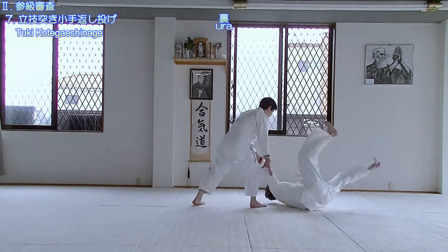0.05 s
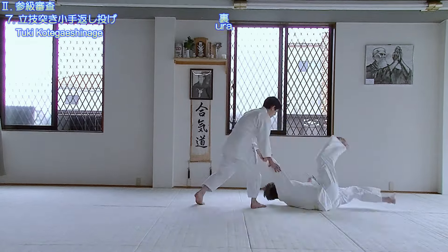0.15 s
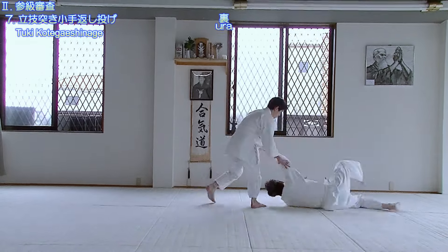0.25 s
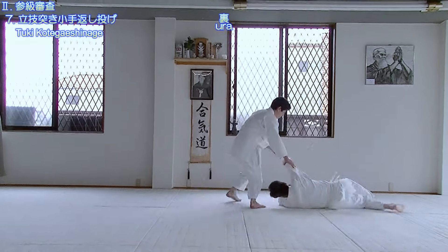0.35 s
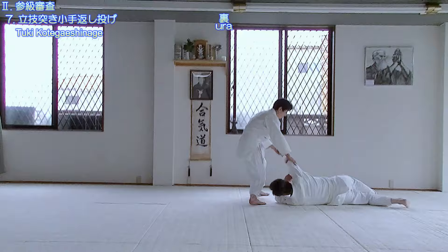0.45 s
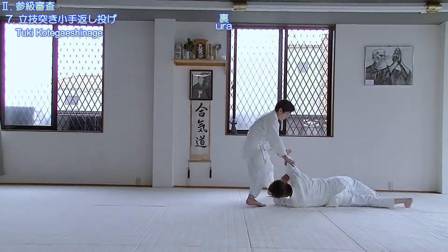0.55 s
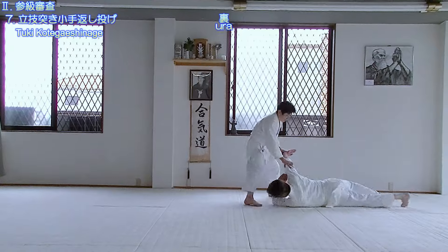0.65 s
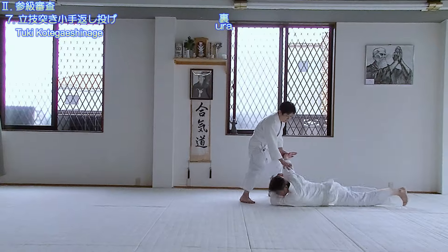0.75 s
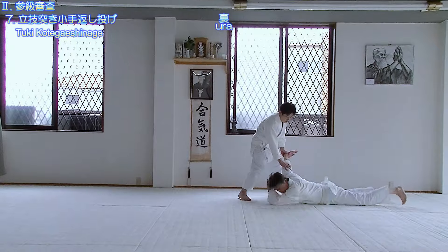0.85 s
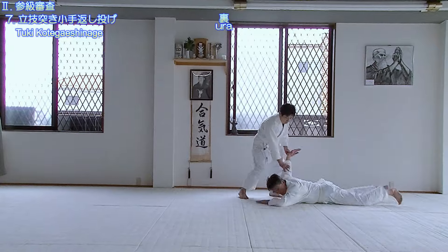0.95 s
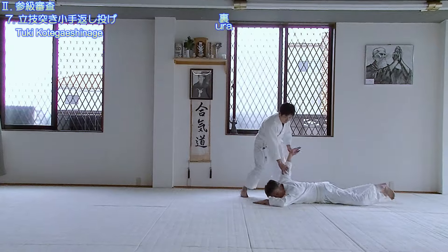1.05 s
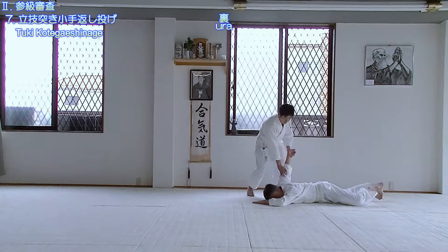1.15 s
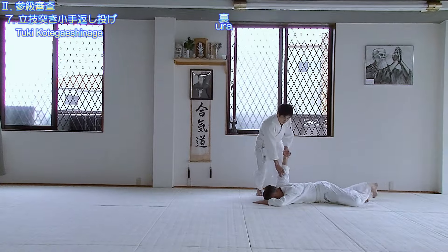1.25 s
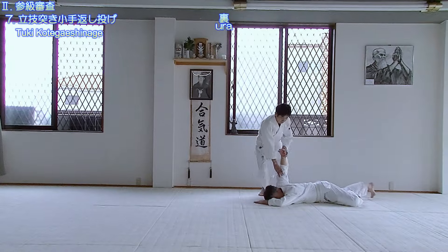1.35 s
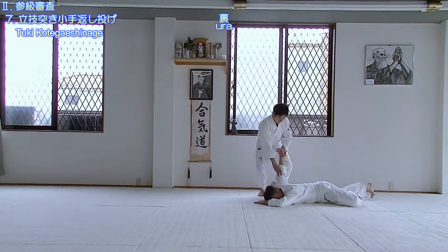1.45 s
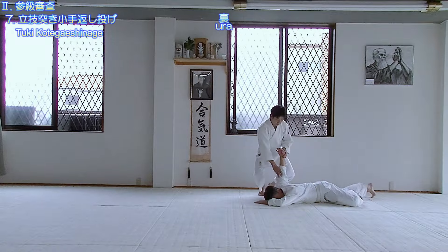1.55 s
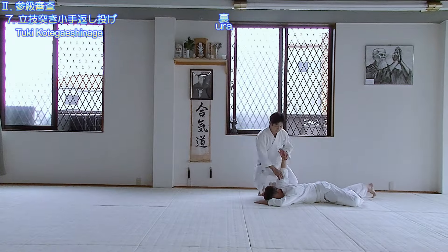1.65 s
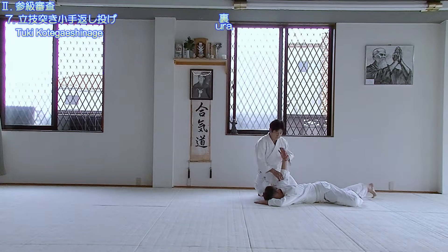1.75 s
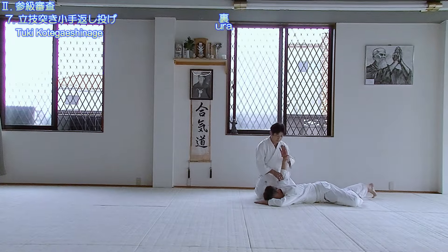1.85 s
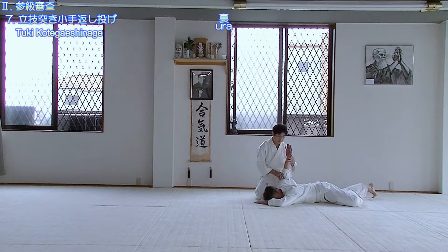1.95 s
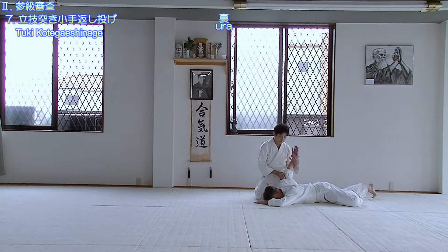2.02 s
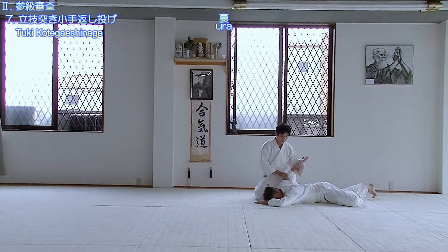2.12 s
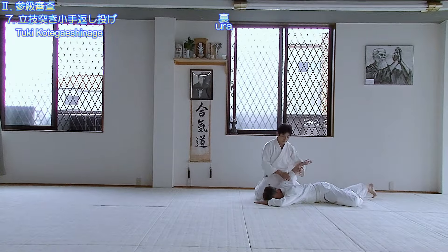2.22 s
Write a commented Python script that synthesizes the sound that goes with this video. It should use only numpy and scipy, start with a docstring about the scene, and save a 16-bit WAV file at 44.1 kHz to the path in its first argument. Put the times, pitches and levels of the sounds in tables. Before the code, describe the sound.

Loud tumbling thumps and bright slaps on a sprung mat floor, followed by dragging cotton, brief squeaks and a second slapping thump, then quiet outdoor hum; bare reverberant hall, heard by a stereo camera at some distance.

```python
"""Throw and pin on padded mats

A person is thrown onto padded mats in a bare hall, rolls over and is pinned.
Limbs thump as sinking damped tones with puffs of air, slap as bright noise bursts and ring the sprung floor.
The roll is made of soft bumps, cotton and feet of dense clicks, and squeaks of gliding narrow noise.
Street noise, a low hum and a thin high chirr, all shaped noise and tone, come through open windows.
"""
import sys
import numpy as np
from scipy import signal
from scipy.fft import rfft, irfft
from scipy.io import wavfile
from scipy.ndimage import uniform_filter1d

SR = 44100
rng = np.random.default_rng(int(sys.argv[2]) if len(sys.argv) > 2 else 0)


def persist_wave(psi):
    """Save psi, clipped to +-1, as 16-bit WAV."""
    counts = np.round(np.clip(psi, -1, 1) * 32767).astype(np.int16)
    wavfile.write(sys.argv[1], SR, np.atleast_2d(counts).T)


def gain_from_db(level_db):
    """Convert decibel levels to linear amplitude factors (20 dB per decade)."""
    decades = np.asarray(level_db, float) / 20
    return 10 ** decades


N = 101430  # samples, 2.3 s
T = np.arange(N) / SR

# Spectrum of the street wash. Each row: frequency in Hz, relative level in dB per Hz.
STREET_COLOUR = [(33, -30), (40, -10), (56, -5.5), (150, -8), (340, -3), (765, -8), (1100, -7), (1900, -12),
                 (2700, -19), (4000, -26), (8000, -35.5), (13300, -40), (15100, -52), (15350, -80)]
# Slow swell of the street. Each row: time in seconds, gain in dB.
STREET_SWELL = [(0, 1.5), (1.86, 0), (1.93, 1.5), (2.05, -0.5), (2.3, -1)]
# Low hum. Each row: pitch in Hz, level in dB rms, width in Hz of its wavering part.
HUM = [(65.4, -54.5, 2.3)]
# Bands of the high chirr. Each row: centre in Hz, width in Hz of each of two passes,
# level in dB rms ahead of the throb.
CHIRR = [(14540, 590, -62.5), (14351, 40, -71), (14400, 720, -67.5)]
# Cloth and sliding feet. Each row: time in seconds, level in dB, centre of the swish in Hz,
# swish share of the power 0-1.
CLOTH_STROKES = [(0, -47.5, 3720, 0.4), (.07, -59.5, 2100, 0), (.205, -51, 2420, 0.56),
                 (.225, -34, 2410, 1), (.335, -36, 2220, 0.91), (.38, -30.5, 1950, 0.82),
                 (.53, -33.5, 2240, 0.03), (.668, -43.5, 2040, 0.4), (.7, -36, 3260, 0),
                 (.745, -36.5, 3120, 0.02), (.785, -35, 3410, 0.06), (.86, -40, 2870, 0.19),
                 (.96, -41.5, 2900, 0.02), (1.01, -34, 3150, 0.7), (1.08, -38.5, 2660, 0.36),
                 (1.25, -45, 2520, 0.04), (1.4, -52, 2190, 0.35), (1.6, -62, 2100, 0.5)]
# Spectrum of the wide rustle. Each row: frequency in Hz, relative level in dB per Hz.
CLOTH_COLOUR = [(530, -34), (900, -11), (1230, -13), (2020, -3.5), (2390, -8.5), (3380, -3.5), (6200, -7.5),
                (14100, -17.5), (15300, -58)]
# Skin and cloth squeaking on the mat. Each row: start in seconds, length in seconds, level in dB,
# start pitch in Hz, end pitch in Hz.
SQUEAKS = [(0.434, 0.073, -27, 658, 705), (0.429, 0.25, -37.5, 2090, 2022),
           (0.69, 0.043, -38.5, 3190, 3530), (0.758, .032, -40, 3310, 3200),
           (0.771, 0.022, -40, 4520, 4600), (0.816, 0.019, -38, 3030, 2730),
           (0.97, 0.052, -28.5, 1062, 1060)]
# The body's weight dragging over the mat. Each row: time in seconds, level in dB.
DRAG_LEVEL = [(0, -39.5), (.06, -42), (.205, -40.5), (.225, -19), (.33, -22), (.4, -21), (.54, -26),
              (.64, -40.5), (.75, -41.5), (.83, -35), (.96, -33), (1.0, -22.5), (1.12, -30), (1.16, -47),
              (1.3, -42), (1.45, -61)]
# Spectrum of the dragging bumps. Each row: frequency in Hz, relative level in dB per Hz.
DRAG_COLOUR = [(29, -23), (50, -17.5), (145, -9), (185, -2), (245, -1.5), (448, -5.5), (643, -5),
               (1050, -13.5), (2020, -21), (2500, -29), (3250, -29), (5500, -120)]
# Hands and feet slapping the vinyl. Each row: start in seconds, level in dB, brightest frequency in Hz,
# share of that band in the power 0-1, t60 in seconds.
SLAPS = [(0.212, -15.5, 4630, 0.01, 0.039), (0.221, -25, 2570, 0.18, 0.32), (0.349, -13, 2010, 0.18, 0.071),
         (0.362, -19, 1850, 0.44, 0.086), (0.417, -21, 2130, 0, 0.062), (0.9818, -18.5, 3600, 0.8, 0.031),
         (0.9877, -16, 3200, 0.57, 0.042), (0.998, -26.5, 4700, 0.17, 0.12), (1.459, -46, 4000, 0.01, 0.24)]
# Spectrum of a slap's air burst. Each row: frequency in Hz, relative level in dB per Hz.
SLAP_COLOUR = [(410, -35.5), (700, 15), (1560, 3.5), (2080, 8.5), (2490, -0.5), (4190, 0.5), (5430, -4.5),
               (13800, -20), (15300, -58)]
# Modes of the boards under the mat. Each row: frequency in Hz, relative level in dB, t60 in seconds.
FLOOR_MODES = [(64.3, 0, 0.61), (94.7, 7.5, 0.16), (109.6, 11.5, 0.196), (131, 0.5, 0.43)]
# Body weight reaching the boards. Each row: start in seconds, level in dB,
# weight of the lowest mode 0-1 (the other modes get the rest).
BOOMS = [(0.039, -35.5, 0.78), (0.214, -24.5, 0.08), (0.248, -25, 1), (0.375, -20, 0.48), (0.4, -25, 0.88),
         (0.491, -28.5, 0.6), (0.98, -32.5, 0.66), (1.05, -40.5, 0.6)]
# Limbs landing. Each row: start in seconds, thump level in dB, mat pitch in Hz at the start,
# t60 in seconds before the cap LONGEST_T60.
THUMPS = [(0.039, -27.5, 285, 0.11), (.213, -14, 457, 0.086), (0.219, -18.5, 257, 0.088),
          (.236, -13.5, 185.4, 0.11), (0.274, -13, 430, 0.069), (.289, -17, 182.4, 0.15),
          (0.3484, -4, 274, 0.083), (0.37, -11, 222, 0.1), (0.414, -16, 248, 0.11),
          (0.445, -12.5, 202.5, 0.2), (0.411, -18.5, 667, 0.11), (.511, -8.5, 249, 0.054),
          (0.536, -23.5, 213, 0.07), (0.635, -30, 279, 0.12), (0.823, -23, 353, 0.053),
          (0.84, -20.5, 293, 0.065), (0.974, -19, 298, 0.046), (.983, -12, 292, 0.07),
          (0.994, -13, 379, 0.071), (1.01, -11, 237, 0.06), (1.061, -20.5, 298, 0.14),
          (1.098, -20.5, 197, 0.19), (1.161, -28, 197, 0.1)]
# Decay of the hall. Each row: frequency in Hz, t60 in seconds.
HALL_DECAY = [(250, 0.43), (1000, 0.98), (4000, 0.74), (12000, 0.31)]
# Likeness of the two ports. Each row: frequency in Hz, approximate left-right likeness 0-1.
SAME = [(300, .999), (1200, 0.95), (2500, 0.89), (5000, 0.84), (9000, 0.95), (14000, 0.99)]
# Balance of the two ports. Each row: frequency in Hz, left minus right in dB.
BALANCE = [(40, -2.5), (300, -2), (1400, -1), (2800, 0.1), (14000, 0.2)]

STREET_DB = -43  # rms ahead of the swell
CHIRR_THROB_DB, CHIRR_THROB_S = 3, 0.0032  # rms depth, smoothing time
FIBRES_PER_S, FIBRE_SPREAD_DB, SWISH_WIDTH_HZ = 3900, -0.5, 1820  # width of each of two passes
SQUEAK_WIDTH = 0.016  # share of the start pitch for each kHz: high squeaks are rougher
BUMPS_PER_S, BUMP_SPREAD_DB = 1200, 2.5
SLAP_RISE_S, SLAP_WIDTH = 0.0008, 0.5  # width as a share of the brightest frequency
BOOM_RISE_S = 0.007
THUMP_RISE_S, LONGEST_T60 = 0.001, 0.14  # seconds
SAG_PER_S = 2.2  # share of the pitch lost per second as the limb settles
PUFF_T60, PUFF_DB = 0.079, -11  # seconds, level relative to its thump
HALL_DB, SCATTER_S = -9.5, 0.04
LOW_CUT_HZ, EDGE_HZ = 24, 15760
KNEE_DB, SQUEEZE = -21, 0.31  # dB of gain taken per dB above the knee
ATTACK_S, RECOVER_DB_PER_S = 0.0035, 22.5  # smoothing time, fall of the held level


def evened(x):
    """Scales to rms 1."""
    return x / np.sqrt(np.mean(x ** 2) + 1e-20)


def read(points, hz):
    """Reads a table on a log-frequency axis."""
    f, value = np.transpose(points)
    return np.interp(np.log(hz + 1), np.log(f + 1), value)


def curve(table, column=1):
    """Reads one column of a time table at every sample."""
    rows = np.array(table, float)
    return np.interp(T, rows[:, 0], rows[:, column])


def colour(x, points):
    """Filters by a spectrum table with minimum phase, so that attacks stay sharp."""
    hz = abs(np.fft.fftfreq(8192, 1 / SR))
    log_gain = np.log(gain_from_db(np.maximum(read(points, hz), -100)))
    response = np.exp(np.conj(signal.hilbert(log_gain)))
    taps = np.fft.ifft(response).real[:4096]
    return signal.oaconvolve(x, taps)[:len(x)]


def resonate(x, hz, width):
    """A resonance of gain 1 that follows hz: shifts it to zero, smooths and shifts back."""
    turn = np.exp(2j * np.pi * np.cumsum(hz * np.ones(len(x))) / SR)
    r = np.exp(-np.pi * width / SR)
    return 2 * (turn * signal.lfilter([1 - r], [1, -r], x / turn)).real


def resonate_twice(x, hz, width):
    """Two equal resonances in a row, for steeper skirts."""
    return resonate(resonate(x, hz, width), hz, width)


def grains(per_s, spread_db):
    """Random clicks of either sign, their sizes spread exponentially in dB."""
    size = gain_from_db(spread_db * np.minimum(rng.exponential(1, N), 4))
    sign = rng.choice([-1., 1.], N)
    return size * sign * (rng.random(N) < per_s / SR)


def add(mix, s, sound):
    """Mixes a sound in at a time."""
    part = mix[round(s * SR):][:len(sound)]
    part += sound[:len(part)]


def street():
    """Street wash: noise built in short spectra whose level drifts in patches of time and pitch."""
    frames, hz = N // 256 + 5, np.fft.rfftfreq(1024, 1 / SR)
    real, imaginary, patches = rng.standard_normal((frames, 513, 3)).T
    patches = uniform_filter1d(patches, 14, 0)
    patches_db = evened(uniform_filter1d(patches, 10, 1))  # 1 dB rms
    spectra = (real + 1j * imaginary) * gain_from_db(read(STREET_COLOUR, hz)[:, None] + patches_db)
    wash = signal.istft(spectra, nperseg=1024, noverlap=768)[1][:N]
    return gain_from_db(STREET_DB + curve(STREET_SWELL)) * evened(wash)


def hum():
    """A low hum: a steady sine wavers against narrow noise on the same pitch."""
    out = np.zeros(N)
    for hz, db, width in HUM:
        waver = evened(resonate(rng.standard_normal(N), hz, width))
        out += gain_from_db(db) * evened(np.sin(2 * np.pi * hz * T) + 0.93 * waver)
    return out


def chirr():
    """A thin high chirr: narrow noise bands throbbing together, quickly and at random."""
    out = np.zeros(N)
    for hz, width, db in CHIRR:
        out += gain_from_db(db) * evened(resonate_twice(rng.standard_normal(N), hz, width))
    throb = evened(uniform_filter1d(rng.standard_normal(N), round(CHIRR_THROB_S * SR)))
    return out * gain_from_db(CHIRR_THROB_DB * throb)


def cloth():
    """Dense fibre clicks: a wide rustle and a narrower swish that moves with the stroke."""
    fibres = grains(FIBRES_PER_S, FIBRE_SPREAD_DB)
    hz, share = curve(CLOTH_STROKES, column=2), curve(CLOTH_STROKES, column=3)
    swish = evened(resonate_twice(fibres, hz, SWISH_WIDTH_HZ))
    rustle = evened(colour(fibres, CLOTH_COLOUR))
    mix = np.sqrt(1 - share) * rustle + np.sqrt(share) * swish
    return mix * gain_from_db(curve(CLOTH_STROKES)) * (T < CLOTH_STROKES[-1][0])


def squeaks():
    """Short fuzzy whistles: narrow noise that glides in pitch under one arch."""
    out, air = np.zeros(N), rng.standard_normal(N)
    for s, length, db, from_hz, to_hz in SQUEAKS:
        u = np.arange(0, length, 1 / SR) / length  # 0-1 through the squeak
        hz = from_hz + (to_hz - from_hz) * u
        width = SQUEAK_WIDTH * from_hz ** 2 / 1000
        tone = evened(resonate_twice(air[round(s * SR):][:len(u)], hz, width))
        add(out, s, gain_from_db(db) * np.sin(np.pi * u) * tone)
    return out


def drag():
    """Many small soft bumps as the body rolls and slides."""
    bumps = evened(colour(grains(BUMPS_PER_S, BUMP_SPREAD_DB), DRAG_COLOUR))
    return bumps * gain_from_db(curve(DRAG_LEVEL)) * (T < DRAG_LEVEL[-1][0])


def slaps():
    """A sudden burst of air squeezed out, with a bright band set by the cupped shape."""
    out, t = np.zeros(N), np.arange(SR // 4) / SR
    air = evened(colour(rng.standard_normal(N + SR), SLAP_COLOUR))
    for s, db, hz, share, t60 in SLAPS:
        burst = air[round(s * SR):][:len(t)]
        band = evened(resonate_twice(burst, hz, hz * SLAP_WIDTH))
        shape = (1 - np.exp(-t / SLAP_RISE_S)) * gain_from_db(db - 60 * t / t60)
        add(out, s, shape * (np.sqrt(1 - share) * burst + np.sqrt(share) * band))
    return out


def booms():
    """The boards swell up and ring low; where the weight lands sets the share of the lowest mode."""
    out, t = np.zeros(N), np.arange(SR // 2) / SR
    for s, db, share in BOOMS:
        boom = np.zeros(len(t))
        for k, (hz, mode_db, t60) in enumerate(FLOOR_MODES):
            weight = share if k == 0 else 1 - share
            ring = np.sin(2 * np.pi * (hz * t + rng.random()))
            boom += weight * gain_from_db(mode_db - 60 * t / t60) * ring
        add(out, s, gain_from_db(db) * (1 - np.exp(-t / BOOM_RISE_S)) * boom)
    return out


def landings():
    """Each limb gives a damped mat thump, sinking in pitch, with a puff of air."""
    out, t = np.zeros(N), np.arange(SR // 4) / SR
    air = rng.standard_normal(N + SR)
    for s, db, hz, t60 in THUMPS:
        puff = evened(resonate(air[round(s * SR):][:len(t)], hz * 0.95, hz * 0.41))
        puff = puff * gain_from_db(PUFF_DB - 60 * t / PUFF_T60)
        ring = -np.sin(2 * np.pi * hz * t * (1 - SAG_PER_S * t / 2))
        ring = ring * gain_from_db(-60 * t / min(t60, LONGEST_T60))
        add(out, s, gain_from_db(db) * (1 - np.exp(-t / THUMP_RISE_S)) * (ring + puff))
    return out


def hall(x):
    """Bare-hall reverberation: sparse random taps dying band by band."""
    taps = np.zeros(SR)
    at = np.arange(300, SR - 20, 20) + rng.integers(0, 20, (SR - 301) // 20)
    taps[at] = rng.choice([-1., 1.], len(at))
    hz, t, z = signal.stft(taps, SR, nperseg=256)
    decay = gain_from_db(-60 * t / read(HALL_DECAY, hz)[:, None])
    tail = signal.istft(z * decay, SR, nperseg=256)[1]
    return signal.fftconvolve(x, gain_from_db(HALL_DB) * tail / np.linalg.norm(tail))[:N]


def ports(mid):
    """Two close microphone ports: nearly the same sound, plus a scattered part that differs between them."""
    hz = np.fft.rfftfreq(N, 1 / SR)
    scatter = rng.standard_normal(8000) * np.exp(-np.arange(8000) / SR / SCATTER_S)
    scattered = signal.oaconvolve(mid, scatter / np.linalg.norm(scatter))[:N]
    apart = np.sqrt((1 - read(SAME, hz)) / 2)
    shared, differing = rfft(mid), rfft(scattered) * apart
    tilt = gain_from_db(read(BALANCE, hz) / 2)  # half the balance on each side
    left = irfft((shared + differing) * tilt, N)
    right = irfft((shared - differing) / tilt, N)
    return np.array([left, right])


def scene():
    """The action with its hall, over the sound from outside."""
    outside = street() + hum() + chirr()
    action = cloth() + squeaks() + drag() + slaps() + booms() + landings()
    return ports(action + hall(action) + outside)


def top_cut(x):
    """Nothing passes above the cut-off."""
    return signal.sosfilt(signal.butter(12, 15780, fs=SR, output="sos"), x)


def record(dry):
    """A low cut; the camera's gain control leans on the loud blows a moment late; then the band limit."""
    low_cut = signal.butter(2, LOW_CUT_HZ, "high", fs=SR, output="sos")
    dry = signal.sosfilt(low_cut, dry)
    r = np.exp(-1 / SR / ATTACK_S)
    power = signal.lfilter([1 - r], [1, -r], (dry ** 2).mean(0))
    power_db = 10 * np.log10(power + 1e-12)
    # the loudest level so far is held and falls at a steady rate
    fall = T * RECOVER_DB_PER_S
    level_db = np.maximum.accumulate(power_db + fall) - fall
    over_db = np.maximum(level_db - KNEE_DB, 0)
    held = dry / gain_from_db(SQUEEZE * signal.lfilter([1 - r], [1, -r], over_db))
    band_limit = signal.firwin(511, EDGE_HZ, window=("kaiser", 9), fs=SR)
    mix = signal.oaconvolve(held, band_limit[None], "same")
    return top_cut(mix)


dry = scene()
out = record(dry)
persist_wave(out)
```